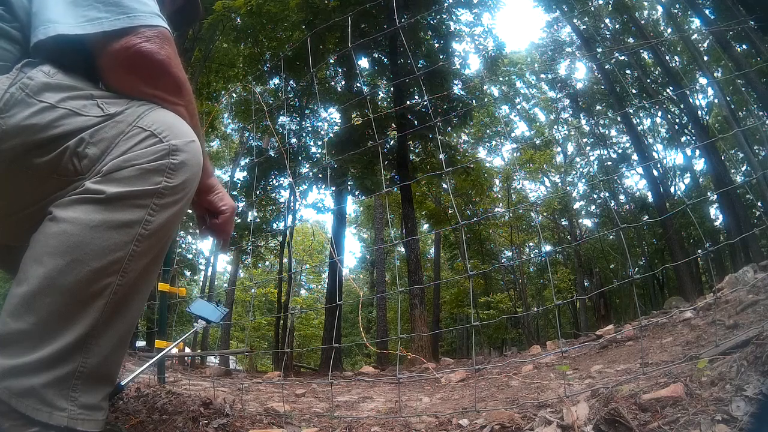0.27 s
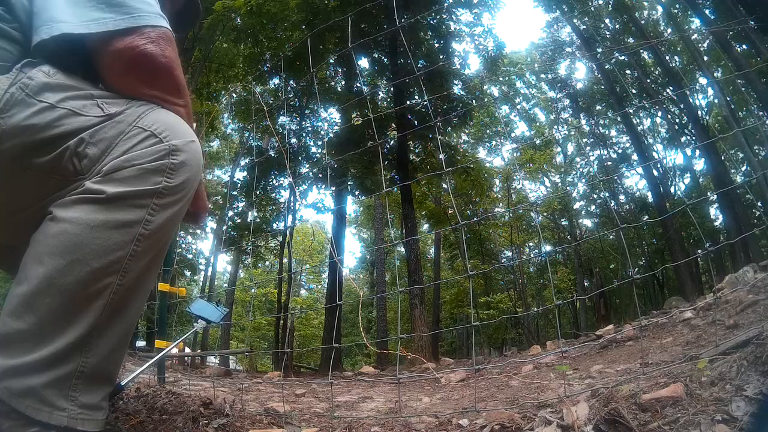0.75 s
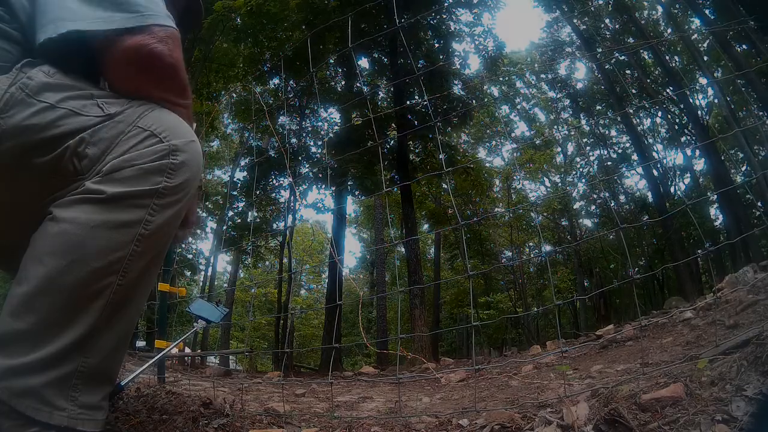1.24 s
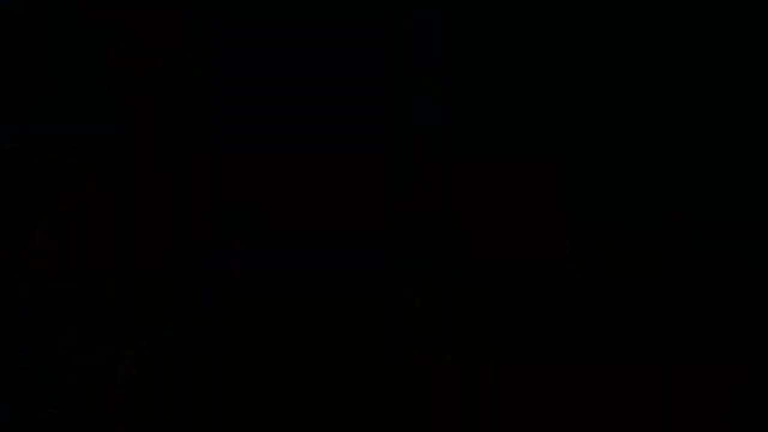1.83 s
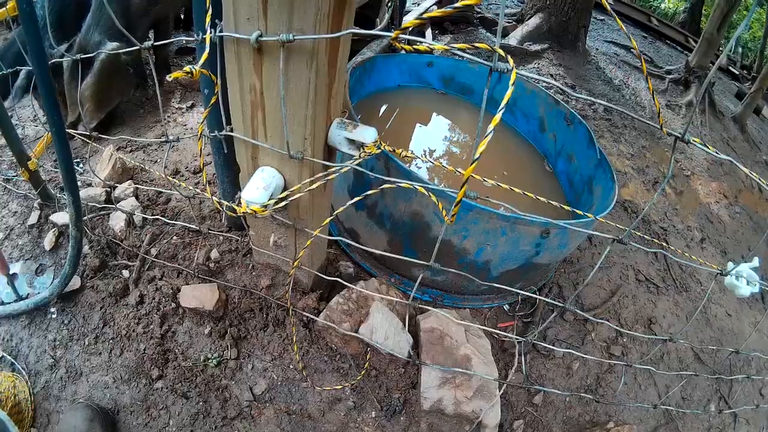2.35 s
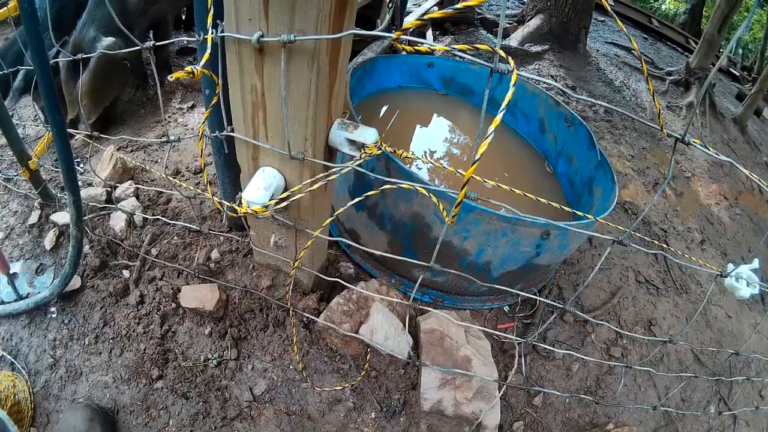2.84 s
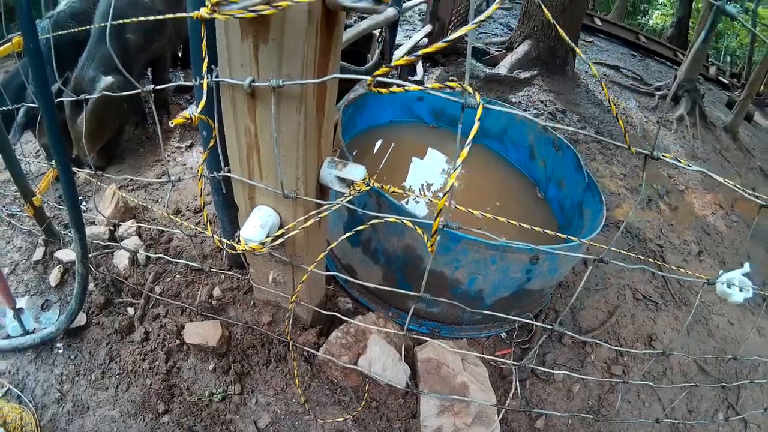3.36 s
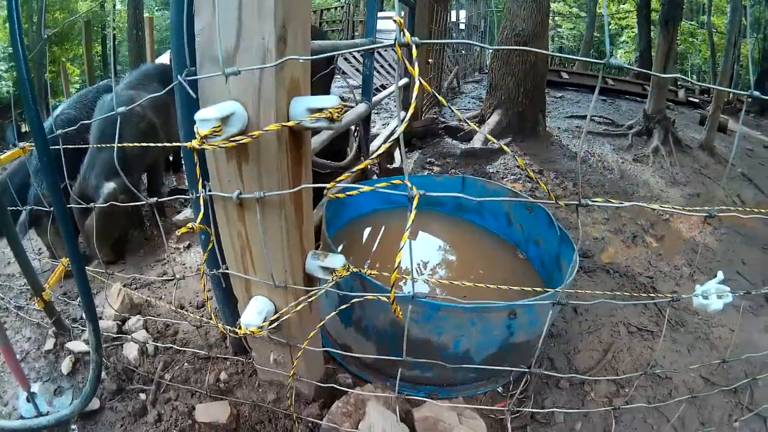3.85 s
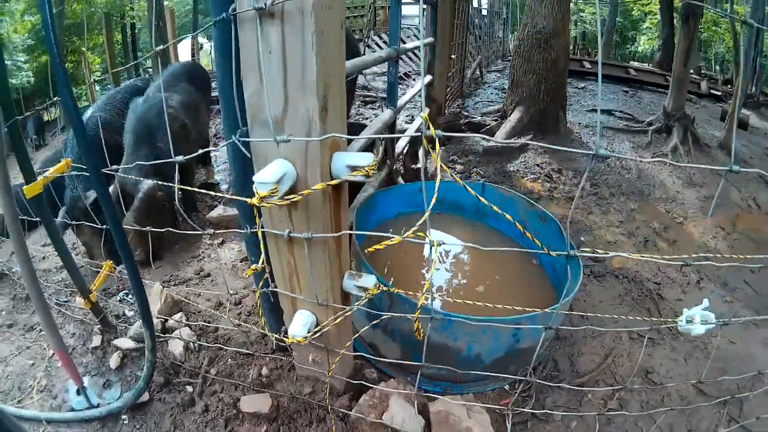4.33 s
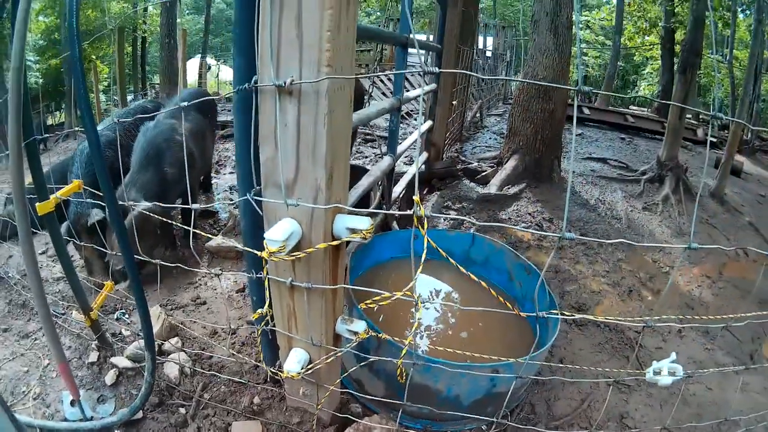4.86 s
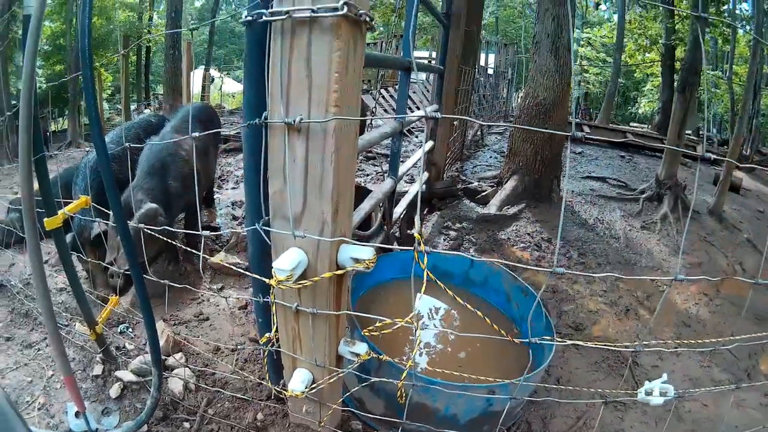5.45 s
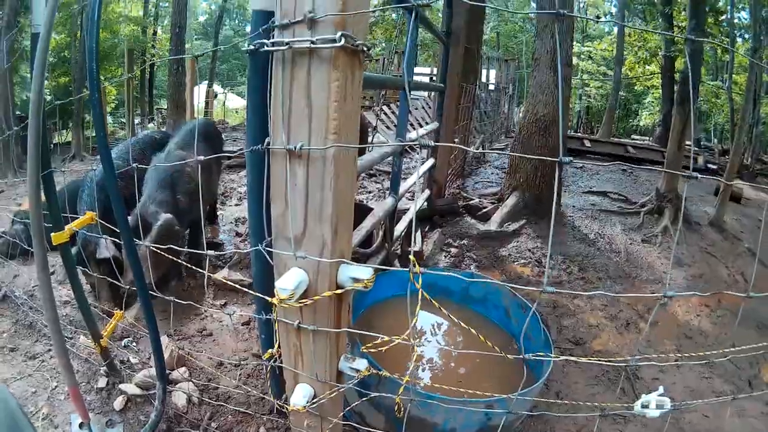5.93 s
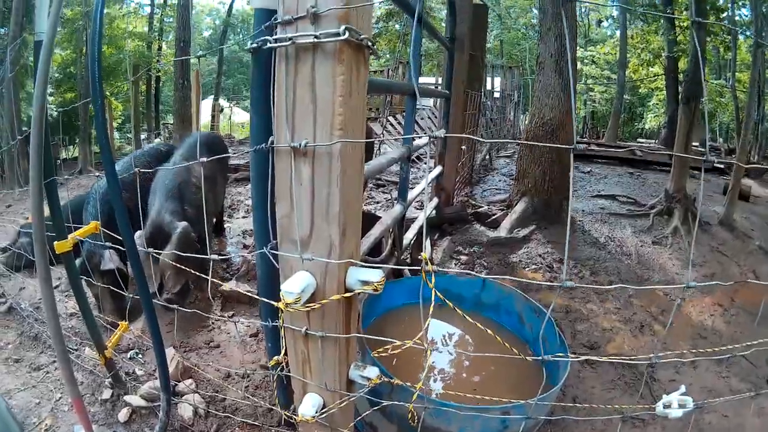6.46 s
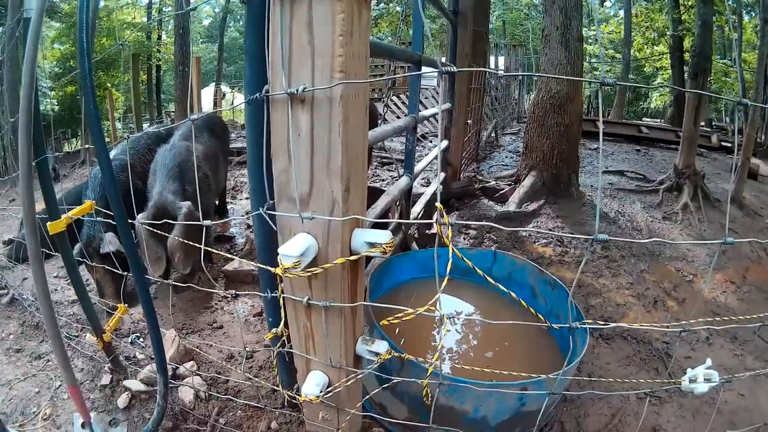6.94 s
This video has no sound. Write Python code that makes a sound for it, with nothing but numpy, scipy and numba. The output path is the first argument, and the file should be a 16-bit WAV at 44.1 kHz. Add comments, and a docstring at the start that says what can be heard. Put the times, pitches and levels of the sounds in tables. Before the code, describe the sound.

Soft birdsong and leaf rustle cut to pigs' wet mouthing in mud, soon buried under close plastic creaking and finger rubbing on the left.

```python
"""Birds whistle over a rustling wood; after a short silence near 2 s, pigs root and smack behind a fence.
Smacks are saliva crackle through a gliding mouth resonance; rustles are granular noise; birds, swept sines.
The camera is picked up: friction noise rubs its left side, and stick-slip pulses creak in the grip.
Taps, bumps and a squeak are short decaying bursts. A humming motor, faint at first, and coloured noise
form the background."""
import sys
import numpy as np
from scipy import signal
from scipy.fft import rfft, irfft, next_fast_len
from scipy.io import wavfile
from scipy.ndimage import uniform_filter1d
from numba import njit

SR = 44100
rng = np.random.default_rng(int(sys.argv[2]) if len(sys.argv) > 2 else 0)


def file_out(sig):
    """Save sig as 16-bit WAV at sys.argv[1]."""
    # one column per channel
    cols = np.atleast_2d(sig).T
    # limit, then scale
    lim = np.clip(cols, -1, 1)
    pcm = np.round(lim * 32767).astype(np.int16)
    wavfile.write(sys.argv[1], SR, pcm)


N = 317079
TIME = np.arange(N) / SR
# the silence between the first place and the pen
PAUSE_START_S, PAUSE_END_S = 1.943, 1.981


def undb(db):
    """Decibel law: level to amplitude gain."""
    return 10 ** (np.asarray(db) / 20)


def unit(x):
    """Power normalisation: scale to rms 1."""
    return x / np.sqrt(np.mean(x ** 2) + 1e-20)


def curves(table):
    """Piecewise-linear envelopes: the dB columns of a table through time, at -150 dB outside it."""
    s, *columns = np.transpose(table)
    return [np.interp(TIME, s, column, left=-150, right=-150) for column in columns]


def colour(x, points):
    """Linear filtering: weight the spectrum by a curve in dB, straight over log frequency."""
    hz, db = np.transpose(points)
    size = next_fast_len(len(x))
    f = np.arange(size // 2 + 1) * SR / size
    gain = undb(np.interp(np.log(f + 1), np.log(hz), db))
    return irfft(rfft(x, size) * gain, size)[:len(x)]


def walk(rate):
    """Band-limited chance: random knots at a rate [Hz], spread near 1; the 4096th knot is held."""
    knots = rng.standard_normal(4096)
    return 1.615 * np.interp(TIME * rate, np.arange(len(knots)), knots)


def grains(rate, spread_db):
    """Shot noise: tiny clicks of very unequal size, at a mean rate [Hz], over smooth noise."""
    size_db = spread_db * np.minimum(rng.exponential(size=N), 5)
    clicks = (rng.random(N) < rate / SR) * rng.standard_normal(N) * undb(size_db)
    return unit(unit(clicks) + 1.76 * rng.standard_normal(N))


def add(track, start_s, sound):
    """Superposition: mix a short sound into a track."""
    i = max(int(start_s * SR), 0)
    track[i:i + len(sound)] += sound[:max(N - i, 0)]


def ports(left, right, right_db):
    """Level difference between two microphone ports, the right one weaker."""
    return np.array([left, right * undb(right_db)])


def trees(x, t60_s, wet_db, right_db):
    """Multiple scattering: direct sound plus sparse decaying echoes, unrelated at the two ports."""
    t = TIME[:SR]
    echoes = rng.standard_normal((2, SR)) * (rng.random((2, SR)) < .1)
    tails = echoes * (t > .004) * undb(-60 * t / t60_s)
    left, right = (x + undb(wet_db) * signal.fftconvolve(x, unit(tail) / np.sqrt(SR))[:N] for tail in tails)
    return ports(left, right, right_db)


@njit
def resonance(x, hz, width):
    """Damped resonance: a state-variable band-pass with a moving centre and a width in Hz."""
    y, band, low = np.empty(len(x)), 0., 0.
    for i in range(len(x)):
        g, k = np.tan(np.pi * hz[i] / SR), width / hz[i]
        v = (band + g * (x[i] - low)) / (1 + g * (g + k))
        band, low, y[i] = 2 * v - band, low + 2 * g * v, k * v
    return y


# wet smacks of the mouths:
# (centre time [s], level [dB], starting mouth pitch [Hz], glide per length [octaves], length [s])
MOUTH_SMACKS = [(1.995, -56.5, 1090, -0.24, 0.031), (2.444, -47, 1180, 0.53, 0.02),
                (2.487, -53, 1150, -0.59, 0.018), (2.548, -54.5, 1040, -0.35, 0.012),
                (2.814, -61.5, 2500, -.1, 0.07), (2.886, -45.5, 2340, -0.47, 0.0045),
                (2.957, -44.5, 1025, 0.0075, 0.011), (2.958, -40, 2700, -0.14, 0.011),
                (2.989, -43, 1330, -0.31, 0.015), (3.046, -51.5, 1750, 0.47, 0.032),
                (3.067, -58, 2890, -0.082, 0.037), (3.113, -47, 1100, -0.058, 0.0077),
                (3.225, -47, 1200, -0.64, 0.016), (3.312, -43, 1900, -0.12, 0.01),
                (3.363, -44, 970, -0.46, 0.023), (3.46, -34, 1140, -0.18, 0.026),
                (3.748, -44.5, 2030, -0.18, .012), (3.785, -38, 764, 0.6, 0.032),
                (3.863, -44.5, 1360, 0.22, 0.019), (4.346, -42.5, 930, 0.12, 0.019),
                (4.783, -43.5, 1300, -0.095, 0.019), (4.911, -48.5, 1400, 0.25, 0.017),
                (5.128, -45.5, 1480, -0.11, 0.025), (5.454, -54.5, 1720, -1.15, 0.032),
                (6.051, -44, 1350, -.5, .014), (6.151, -45, 1600, 0.3, .016),
                (6.44, -47, 1600, 0.18, 0.015), (6.476, -33.5, 1105, 0.00024, 0.017),
                (6.547, -40.5, 3070, 0, 0.0049), (6.567, -44, 1240, 0.37, 0.023),
                (6.916, -45, 400, -0.035, 0.0092), (6.917, -45, 2700, 0.043, 0.0047),
                (6.926, -37, 1080, 0.26, 0.013), (6.956, -47, 1810, 0.066, 0.01),
                (7.019, -47, 2000, 0.11, 0.0084), (7.045, -44.5, 1160, 0.19, 0.024),
                (7.065, -51.5, 2830, -0.13, 0.047)]
# spectrum of crackling crumbs and spit: (frequency [Hz], relative level [dB])
CRUMB_SPECTRUM = [(700, -16.5), (2000, -5), (3000, 6.5), (4300, 0.5), (6500, 6), (9000, -8), (12000, -31),
                  (17000, -19)]
# the mouth resonance is a share of its pitch wide, and broader in a brief smack
MOUTH_WIDTH_SHARE, SMACK_BROADENING = 0.18, 0.83


def pigs(spit_db=-17, broad_db=-12, chew_db=-64, chew_s=0.059):
    """Cavity resonance: saliva crackle rings the mouth, whose pitch slides as the jaw opens or shuts."""
    out, crackle = np.zeros(N), grains(1500, 4)
    spit = unit(colour(grains(900, 3.5), CRUMB_SPECTRUM))
    for s, db, start_hz, glide_octaves, length_s in MOUTH_SMACKS:
        start_s = s - 0.48 * length_s
        part = slice(int(start_s * SR), int((start_s + 3 * length_s) * SR))
        age = (TIME[part] - start_s) / length_s
        hz = start_hz * 2 ** (glide_octaves * np.minimum(age, 1.3))
        width_hz = MOUTH_WIDTH_SHARE * start_hz + SMACK_BROADENING / length_s
        swell = (age / 0.5) ** 2 * np.exp(2 - 2 * age / 0.47)
        cavity = resonance(resonance(crackle[part], hz, 1. * width_hz), hz, 2. * width_hz)
        broad = resonance(crackle[part], hz, 2. * width_hz)
        smack = swell * (unit(cavity) + undb(broad_db) * unit(broad) + undb(spit_db) * spit[part])
        add(out, start_s, undb(db) * unit(smack) * np.sqrt(np.mean(swell ** 2)))
    # the snouts squelch softly in the mud around each smack, longer after it than before
    mouth_hz = 1000 * 2 ** (.5 * np.clip(walk(70), -2, 2))
    squelch = resonance(resonance(crackle, mouth_hz, 450.), mouth_hz, 700.)
    squelch = squelch * undb(5 * np.clip(walk(35), -2, 1))
    distances_s = [np.maximum(TIME - row[0], 3 * (row[0] - TIME)) for row in MOUTH_SMACKS]
    nearness = np.exp(-np.min(distances_s, axis=0) / chew_s)
    out += unit(squelch) * undb(chew_db) * nearness * (TIME > PAUSE_END_S)
    return trees(out, t60_s=.25, wet_db=-9, right_db=-4.5)


# rustles and hisses, leafy or buzzy before the pause, crumbly soil by the pen:
# (start time [s], hold [s], level [dB])
RUSTLES = [(0.16, 0.22, -59), (1.633, .01, -58.5), (2.44, 0.065, -59), (2.604, 0.01, -67.5),
           (2.79, 0.05, -83), (2.88, 0.011, -60), (2.962, 0.027, -70), (3.208, 0.11, -49.5),
           (3.552, .03, -57), (3.736, 0.04, -54), (4.222, 0.024, -53), (4.403, 0.027, -63),
           (5.077, 0.14, -74), (5.538, 0.041, -67), (6.49, 0.073, -59), (6.873, 0.017, -64),
           (6.927, 0.034, -59.5), (7.009, 0.13, -60.5)]
RUSTLE_ATTACK_S, RUSTLE_T60_S = 0.00097, 0.36


def rustles(gain_db=0.5):
    """Granular noise: dense irregular grains start sharply, hold briefly and decay exponentially."""
    envelope = np.zeros(N)
    for s, hold_s, db in RUSTLES:
        attack = np.clip((TIME - s) / RUSTLE_ATTACK_S, 0, 1)
        envelope += attack * undb(db - 60 * np.maximum(TIME - s - hold_s, 0) / RUSTLE_T60_S)
    level = envelope * undb(2.85 * walk(60) + gain_db)
    left, right = (unit(colour(grains(1500, 2.1), CRUMB_SPECTRUM)) * level for _ in range(2))
    return ports(left, right, right_db=-7.0)


# stick-slip knocks of the case:
# (time [s], level [dB], contact frequency [Hz], tick level relative to the knock [dB])
CASE_SLIPS = [(3.294, -21.5, 337, 15.5), (3.36, -18, 380, 2), (3.4604, -18, 381, 17),
              (3.4821, -19, 520.2, 7), (3.6322, -15.5, 477.6, 16), (3.6882, -20, 296, 8.5),
              (3.878, -20, 352, 6.5), (3.892, -25, 307, 7), (4.056, -28, 130, -8), (4.216, -41, 109, 0),
              (4.4995, -32.5, 145, 20), (4.5172, -25, 1900, -5), (4.536, -18.5, 696, 10.5),
              (4.5947, -19.5, 437, -22), (4.6153, -15, 407, -18), (4.6391, -15, 430, -25),
              (4.6511, -11.5, 500, -26), (4.6671, -12.5, 556, -24), (4.6971, -8.5, 556, -23),
              (4.7087, -11.5, 500, -26), (4.7678, -11, 520, -26), (4.8193, -11.5, 413, -31),
              (4.8406, -12, 472, -29), (4.8643, -13, 490, -30), (4.9071, -18, 424, -16),
              (5.8029, -4, 658, -5.5), (5.9064, -5, 603, -7), (5.9767, -2.5, 655, -9),
              (6.0023, -1.5, 740, -10), (6.0297, 0, 754.8, -23), (6.0626, 0, 730, -8),
              (6.0732, -8.5, 674, -16), (6.0885, -4, 664, -13), (6.1436, 0, 716, -8),
              (6.5092, -13.5, 900, -23), (6.5334, -13.5, 900, -22), (6.5925, -9, 960, -2),
              (6.677, -6.5, 938, -5), (6.7234, -15.5, 875, 0)]
# each hold of the hand colours its slips; thump level is relative to a slip of NOMINAL_DB:
# (from time [s], thump level [dB], thump pitch [Hz], time to fall 60 dB [s], start relative to the jerk [s])
HAND_GRIPS = [(3.2, -8, 222, 0.015, -0.0026), (4.4, -27, 149, .018, .002),
              (4.56, -15.5, 152, .018, 0.00084), (5.7, -11, 138, 0.019, .0017),
              (6.148, -13.5, 150, 0.017, .0038), (6.4, -16.5, 148, 0.023, 0.0019)]
# ringing of the case after a slip: (nominal frequency [Hz], t60 [s], relative level [dB])
CASE_RINGING = [(534, 0.013, -2.5), (1100, 0.051, -35), (1620, 0.016, -12)]
# spectrum of the contact letting go: (frequency [Hz], relative level [dB])
TICK_SPECTRUM = [(500, -14), (1500, 3.5), (3000, 1), (4500, -3), (6800, -4.5), (9500, -11), (14000, -21.5),
                 (17000, -30)]
# spectrum of the scuff after a slip: (frequency [Hz], relative level [dB])
SCUFF_SPECTRUM = [(120, 3), (350, 2), (900, -6), (1700, -9), (3000, -30), (8000, -37.5)]
# the thump loses this much, relative to the knock, per dB of a harder slip
NOMINAL_DB, THUMP_LAG_DB_PER_DB = -5, 1


def creaks(crackle=0.34, tick_lead_cycles=0.32, thump_gain_db=-0.5, push_db=-1, ring_db=-4,
           scuff_db=-25, scuff_t60_s=0.08, leak_hz=55):
    """Stick-slip: the contact ticks free, jerks the case back and forth once, rings it and scuffs."""
    out, lead_s, tick_t60_s = np.zeros(N), .005, .005
    t = TIME[:4096] - lead_s
    after = np.maximum(t, 0)
    for s, db, contact_hz, tick_db in CASE_SLIPS + stutter():
        grip = [row for row in HAND_GRIPS if row[0] <= s][-1]
        _, thump_db, thump_hz, thump_length_s, thump_lag_s = grip
        force_db = np.clip(db - NOMINAL_DB, -8, 15)
        u = 2 * np.pi * contact_hz * t
        jerk = undb(push_db) * u * np.exp((1 - u ** 2) / 2)
        detune = 1 + .06 * rng.standard_normal(len(CASE_RINGING))
        ring = np.zeros(len(t))
        for (hz, t60_s, mode_db), shift in zip(CASE_RINGING, detune):
            mode = undb(mode_db - 60 * after / t60_s) * np.sin(2 * np.pi * hz * shift * after)
            # a soft contact hardly reaches the higher modes
            ring += mode / np.hypot(1, (hz / (2 * contact_hz)) ** 4)
        thump_db = thump_db + thump_gain_db - THUMP_LAG_DB_PER_DB * force_db
        recoil = np.maximum(t - thump_lag_s, 0)
        # the hand smothers the recoil within a few swings
        thump_fade = undb(thump_db - 60 * (recoil / thump_length_s) ** 2)
        thump = -thump_fade * np.sin(2 * np.pi * thump_hz * recoil)
        released = t + tick_lead_cycles / contact_hz
        snap = crackle * rng.standard_normal(len(t)) * (released > 0)
        snap = snap * undb(-60 * np.abs(released) / tick_t60_s)
        snap[np.argmax(released > 0)] -= 1
        tick = unit(colour(snap, TICK_SPECTRUM)) / np.sqrt(len(t)) * undb(tick_db)
        scuff = unit(colour(rng.standard_normal(len(t)), SCUFF_SPECTRUM))
        scuff = scuff * (t > 0) * undb(scuff_db - 60 * after / scuff_t60_s)
        add(out, s - lead_s, undb(db) * (jerk + undb(ring_db) * ring + thump + tick + scuff))
    out = signal.sosfilt(signal.butter(2, leak_hz, "high", fs=SR, output="sos"), out)
    return ports(out, out, right_db=-69)


# one of the hardest creaks runs out in a quick, fading stutter
STUTTER_S, STUTTER_GAP_S, STUTTER_DB, STUTTER_FALL_DB_PER_S = 6.1512, 0.0063, -12, 308


def stutter(count=10, contact_hz=600, soften_hz_per_s=3800, tick_db=-14):
    """Decaying relaxation oscillation: slightly uneven slips that soften and die, in CASE_SLIPS columns."""
    late, loud = rng.standard_normal((count, 2)).T
    delays = STUTTER_GAP_S * (np.arange(count) + .17 * late)
    slips = []
    for d, chance in zip(delays, loud):
        db = STUTTER_DB - STUTTER_FALL_DB_PER_S * d + 2 * chance
        slips.append((STUTTER_S + d, db, max(contact_hz - soften_hz_per_s * d, 200), tick_db))
    return slips


# fingers sliding on the case as it is lifted:
# (time [s], rumble level [dB], scrape level [dB], hiss level [dB])
LIFT_HANDLING = [(2.75, -68, -76, -95), (3.02, -72, -53, -72), (3.12, -59, -61.5, -52.5),
                 (3.25, -62, -52, -51.5), (3.41, -52, -41, -47), (3.56, -59, -48.5, -50.5),
                 (3.76, -59, -41, -45), (3.82, -65, -40.5, -45.5), (3.92, -44.5, -39, -42),
                 (3.99, -62, -46.5, -47), (4.02, -39, -33.5, -47.5), (4.12, -34, -38.5, -45.5),
                 (4.2, -37, -37, -40), (4.31, -50.5, -49.5, -41), (4.45, -47, -39.5, -38),
                 (4.53, -42, -33.5, -43), (4.58, -49, -38, -52), (4.68, -39, -36, -62),
                 (4.79, -38, -39, -77), (4.99, -70, -62, -76), (5.07, -65, -57, -65), (5.15, -62, -45, -64),
                 (5.24, -65, -50.5, -62.5), (5.34, -68, -70, -86)]
# fingers gripping the case anew: (time [s], rumble level [dB], scrape level [dB], hiss level [dB])
REGRIP_HANDLING = [(5.761, -58, -66, -66.5), (5.952, -52.5, -70, -62), (6.05, -43.5, -40.5, -53),
                   (6.21, -37.5, -51, -51.5), (6.3, -47.5, -61.5, -54.5), (6.48, -35.5, -43, -43.5),
                   (6.56, -44, -38, -48), (6.64, -58, -50, -54), (6.728, -44, -43.5, -54.5),
                   (6.85, -65, -62, -71), (7.1, -50, -65, -87), (7.18, -70, -70, -80)]
# air gap under the sliding finger: (time [s], mean pitch [Hz], ring relative to the plain scrape [dB])
FINGER_GAP = [(3.1, 1110, -6), (3.42, 920, 4), (3.56, 1490, -11), (3.76, 705, -4.5), (4.05, 890, -0.5),
              (4.3, 1030, -17.5), (4.47, 1550, -11), (4.56, 1390, 3), (4.65, 1610, 4), (4.77, 1530, 3),
              (4.88, 1760, -3.5), (5.2, 1770, 7.5), (6.05, 1270, 5.5), (6.3, 800, 5), (6.5, 1210, 5),
              (6.621, 1310, 4.5), (6.8, 1330, 6)]
# spectrum of the friction shudder: (frequency [Hz], relative level [dB])
RUMBLE_SPECTRUM = [(18, -28), (40, 0), (70, 7), (140, 5), (250, -10.5), (450, -11), (1000, -48.5)]
# spectrum of the plain scrape: (frequency [Hz], relative level [dB])
SCRAPE_SPECTRUM = [(150, -6), (280, -2.5), (550, 6.5), (1000, 1), (1700, 2.5), (2300, -0.5), (3200, -8),
                   (8000, -59)]
# spectrum of the dry rasp: (frequency [Hz], relative level [dB])
RASP_SPECTRUM = [(1200, -21.5), (2200, -3), (3100, -1.5), (4500, -5.5), (6000, -5.5), (10000, -28.5)]
# spectrum of the fine hiss: (frequency [Hz], relative level [dB])
HISS_SPECTRUM = [(1200, -36), (2700, -29.5), (4500, -7.5), (5300, 2), (6600, 0.5), (8000, -1), (10000, -9),
                 (14500, -14.5), (17000, -26.5)]


def fingers(gap_width_hz=560, scrape_gain_db=-0.54, rasp_gain_db=-5.5):
    """Sliding friction: skin on the left of the case gives a shudder, hollow scrape, rasp and hiss."""
    handling = [curves(table) for table in (LIFT_HANDLING, REGRIP_HANDLING)]
    rumble_db, scrape_db, hiss_db = np.max(handling, axis=0)
    catch = walk(45)
    rumble = unit(colour(rng.standard_normal(N), RUMBLE_SPECTRUM)) * undb(rumble_db + 2.8 * catch)
    # the air gap under the finger rings on and off, and its pitch slides and trembles as the grip shifts
    s, pitch_hz, ring_db = np.transpose(FINGER_GAP)
    gap_hz = np.interp(TIME, s, pitch_hz) * 2 ** (.13 * np.clip(walk(110), -2, 2))
    gap = resonance(grains(650, 4.2), gap_hz, 1. * gap_width_hz)
    gap = resonance(gap, gap_hz, 1.06 * gap_width_hz)
    ringing = undb(np.interp(TIME, s, ring_db) + 2.5 * walk(35))
    plain = unit(colour(grains(700, 2.2), SCRAPE_SPECTRUM))
    hollow = (plain + ringing * unit(gap)) / np.hypot(1, ringing)
    scrape = hollow * undb(scrape_db + 2 * catch + scrape_gain_db)
    # the skin's ridges rasp most where it both scrapes and hisses
    rasp_db = (scrape_db + hiss_db) / 2 + 4 * walk(70) + rasp_gain_db
    rasp = unit(colour(grains(400, 4.2), RASP_SPECTRUM)) * undb(rasp_db)
    hiss = unit(colour(grains(1000, 2.0), HISS_SPECTRUM)) * undb(hiss_db + 1.04 * catch)
    rub = rumble + scrape + rasp + hiss
    return ports(rub, rub, right_db=-39.5)


# light dry taps and snaps: (time [s], knock level [dB], knock pitch [Hz],
# sharp click level [dB], right port relative to left [dB])
DRY_TAPS = [(0.4832, -51, 800, -64, -14), (0.89, -73, 1300, -86, -10), (0.947, -68.5, 840, -88, -10),
            (0.9746, -65.5, 955, -91, -8), (1.007, -68, 1050, -86, -9), (1.045, -65, 620, -90, -7),
            (1.6428, -61, 1080, -39.5, -13), (3.122, -56, 1500, -39, -27), (3.359, -28.5, 1410, -59, -30),
            (3.459, -27, 1110, -53, -33), (3.633, -31, 1000, -45, -32), (4.156, -39, 1590, -40, -28),
            (4.181, -31, 1550, -18.5, -34.5), (4.207, -45, 2200, -46.5, -25.5),
            (4.222, -49, 1500, -37, -5.5), (4.302, -52, 1800, -36, -26), (4.83, -49, 1910, -59, -30),
            (5.214, -42.5, 1630, -43, -27), (5.255, -38, 1830, -48, -29), (6.941, -39.5, 1830, -79, -24)]
# spectrum of the sharp click: (frequency [Hz], relative level [dB])
CLICK_SPECTRUM = [(1000, -11), (3000, -13), (5000, -10.5), (7000, 1.5), (9500, -11), (12000, -6.5),
                  (15000, -8.5), (17000, 3)]


def taps(knock_t60_s=0.023, click_t60_s=0.0076, sharpness=3):
    """Impact: a hard contact clicks, and the small thing that is struck answers with a hollow knock."""
    out, t = np.zeros((2, N)), TIME[:2048]
    # the table's levels are those of the whole energy spread over 10 ms
    age, share = t - .004, np.sqrt(.01 / t[-1])
    for s, knock_db, hz, click_db, right_db in DRY_TAPS:
        blow, snap = (rng.standard_normal(len(t)) * (age > 0) * undb(-60 * np.abs(age) / t60_s)
                      for t60_s in (knock_t60_s, click_t60_s))
        centre, width = np.full(len(t), 1. * hz), 1. * hz / sharpness
        knock = resonance(resonance(blow, centre, width), centre, 3 * width)
        click = unit(colour(snap, CLICK_SPECTRUM))
        tap = share * (undb(knock_db) * unit(knock) + undb(click_db) * click)
        add(out[0], s + age[0], tap)
        add(out[1], s + age[0], tap * undb(right_db))
    return out


# soft bumps on the right side of the case: (time [s], peak level [dB], frequency [Hz])
CASE_BUMPS = [(3.463, -35, 80), (4.79, -31, 116), (5.402, -33, 56)]


def bumps(cycles=0.31):
    """Pressure pulse: a fingertip presses the case by the right port in one slow swing."""
    out = np.zeros(N)
    for s, db, hz in CASE_BUMPS:
        swing = np.cos(2 * np.pi * hz * (TIME - s))
        out += undb(db) * swing * np.exp(-((TIME - s) * hz / cycles) ** 2)
    return np.array([out * undb(-30), out])


def squeak(s=3.864, hz=640, rise_hz_per_s=3000, length_s=0.0062, db=-26):
    """Linear chirp: one short, hollow, rising squeak under a bell-shaped envelope."""
    age = TIME - s
    phase = 2 * np.pi * (hz + rise_hz_per_s * age / 2) * age
    tone = undb(db) * np.exp(-(age / length_s) ** 2) * np.sin(phase)
    return trees(tone, t60_s=0.23, wet_db=-12.5, right_db=-8.0)


# bird notes, each one slur:
# (start time [s], length [s], start pitch [Hz], end pitch [Hz], relative level at the high end [dB])
BIRD_NOTES = [(-.01, 0.048, 3010, 3820, -47), (.04, 0.057, 4500, 2590, -46),
              (0.164, 0.045, 3940, 5700, -48.5), (0.209, 0.068, 5400, 2790, -52.5),
              (0.283, 0.031, 2520, 3470, -48.5), (1.406, 0.14, 6200, 5000, -56),
              (1.457, 0.024, 2950, 4300, -55.5), (1.475, 0.039, 3950, 3610, -49.5),
              (1.576, 0.11, 4430, 2440, -49.5), (1.685, 0.039, 2574, 3330, -42.5),
              (2.251, 0.072, 3150, 5380, -61.5), (2.333, 0.15, 5580, 5880, -60.5),
              (4.632, 0.14, 2595, 3270, -61), (5.04, 0.094, 3150, 2203, -51), (5.29, .15, 2600, 2297, -60),
              (5.599, .075, 2700, 3710, -51.5)]
NOTE_EDGE_S = 0.011
# a slur is steep at its high end, and flattens and weakens at its low end; a faint octave rides on it
NOTE_BEND, LOW_END_DB, OCTAVE_DB = 1.3, -6.5, -24.5


def birds(gain_db=-1, far_db=-15, near_t60_s=0.52):
    """Frequency modulation: slurred whistles from the canopy, spread by scattering among the trees."""
    # the burr roughens the notes until its last knot at 2.7 s; later it is a fixed offset of pitch
    burr = np.where(TIME < PAUSE_START_S, .012, .045) * walk(1500)
    out, flutter = np.zeros(N), undb(2 * walk(120))
    for s, length_s, start_hz, end_hz, db in BIRD_NOTES:
        part = slice(max(int(s * SR), 0), int((s + length_s) * SR))
        age = TIME[part] - s
        edge = np.clip(np.minimum(age, length_s - age) / NOTE_EDGE_S, 0, 1)
        low_hz, high_hz = sorted((start_hz, end_hz))
        height = np.clip(age / length_s if end_hz > start_hz else 1 - age / length_s, 0, 1)
        pitch = low_hz * (high_hz / low_hz) ** (height ** NOTE_BEND)
        # the highest notes before the pause break into a buzz
        most_burr = 8 if s < PAUSE_START_S else 1
        pitch = pitch * (1 + burr[part] * np.minimum((pitch / 3200) ** 4, most_burr))
        phase = 2 * np.pi * np.cumsum(pitch) / SR
        whistle = np.sin(phase) + undb(OCTAVE_DB) * np.sin(2 * phase)
        add(out, s, edge * flutter[part] * undb(db + gain_db + LOW_END_DB * (1 - height)) * whistle)
    near = trees(out * (TIME < PAUSE_START_S), t60_s=near_t60_s, wet_db=0, right_db=-7)
    # in the far calls the scattered sound outweighs the direct
    far = trees(out * (TIME > PAUSE_END_S), t60_s=.7, wet_db=20, right_db=-3)
    return near + undb(far_db) * far


def motor(hz=240, db=-57):
    """Tonal hum: a mains motor as one sine whose pitch and level waver slightly."""
    phase = 2 * np.pi * np.cumsum(hz + .5 * walk(3.7)) / SR
    hum = undb(db + 1.8 * walk(1.7)) * np.sin(phase)
    return ports(hum, hum, right_db=-6.5)


# still air of the wood: (frequency [Hz], relative level [dB])
WOOD_SPECTRUM = [(20, -56), (60, 7.5), (130, 4.5), (250, -5.5), (400, -13.5), (1000, -25.5), (2500, -32),
                 (6000, -30.5), (10000, -30), (16000, -42)]
# air by the pen: (frequency [Hz], relative level [dB])
PEN_SPECTRUM = [(20, -17), (70, 3.5), (180, 1), (330, -3.5), (600, -17.5), (950, -17), (1500, -21.5),
                (2600, -18), (4000, -27), (8000, -27), (16000, -42.5)]


def air(points, db, right_db):
    """Spatial coherence: background noise with its bass largely shared by both ports, its treble less."""
    shared = colour(rng.standard_normal(N), [(20, 3.0), (280, -1.5), (700, -4.5)])
    sides = []
    for _ in range(2):
        own = colour(rng.standard_normal(N), [(20, -2.0), (280, -6.0), (600, 6.5)])
        sides.append(unit(colour(shared + own, points)))
    sway_db = 1.3 * walk(9)
    return ports(*sides, right_db) * undb(db + sway_db)


def scene():
    """Superposition of sources: the wood first, with the motor far off, then the pen."""
    wood = air(WOOD_SPECTRUM, db=-69, right_db=-4) + motor(db=-74.5)
    pen = air(PEN_SPECTRUM, db=-66, right_db=-4) + motor()
    background = wood * (TIME < PAUSE_START_S) + pen * (TIME > PAUSE_END_S)
    handling = creaks() + fingers() + taps() + bumps()
    return pigs() + rustles() + handling + squeak() + birds() + background


TOP_HZ = 16300


def record(dry):
    """Band limiting: silence the pause with soft edges, cut the deepest bass, clip, and cut the top."""
    running = uniform_filter1d(1. * ((TIME < PAUSE_START_S) | (TIME > PAUSE_END_S)), size=128)
    sound = signal.sosfilt(signal.butter(2, 36, "high", fs=SR, output="sos"), dry * running)
    low_pass = signal.ellip(8, .2, 70, TOP_HZ, fs=SR, output="sos")
    return signal.sosfilt(low_pass, np.clip(sound, -1, 1))


dry = scene()
out = record(dry)
file_out(out)
```